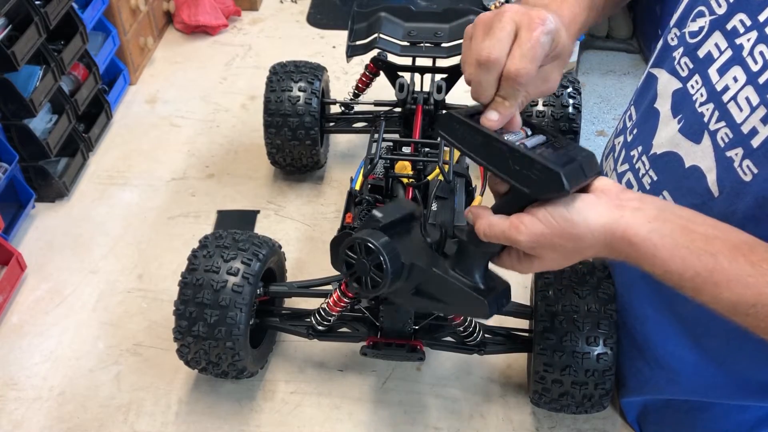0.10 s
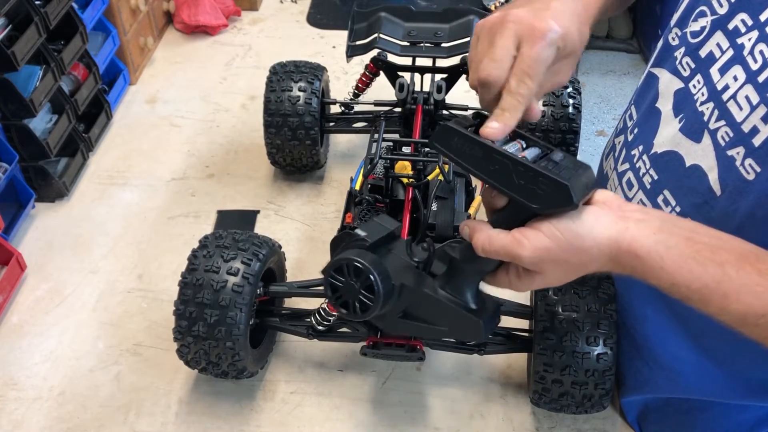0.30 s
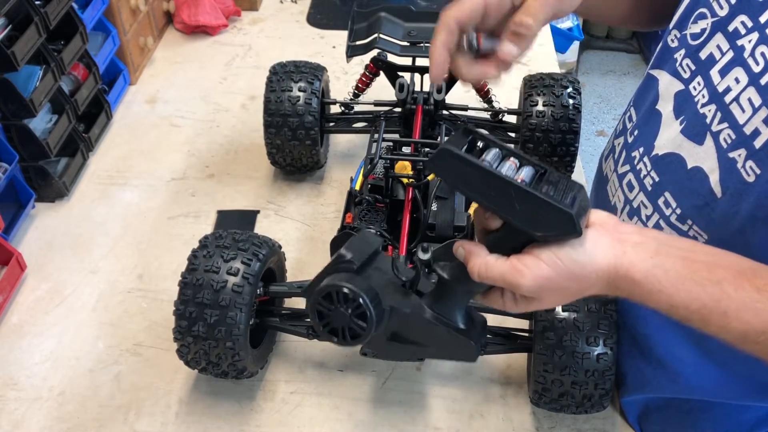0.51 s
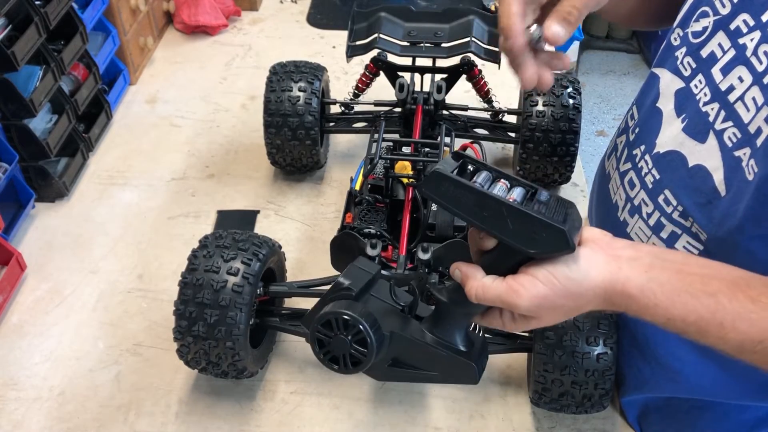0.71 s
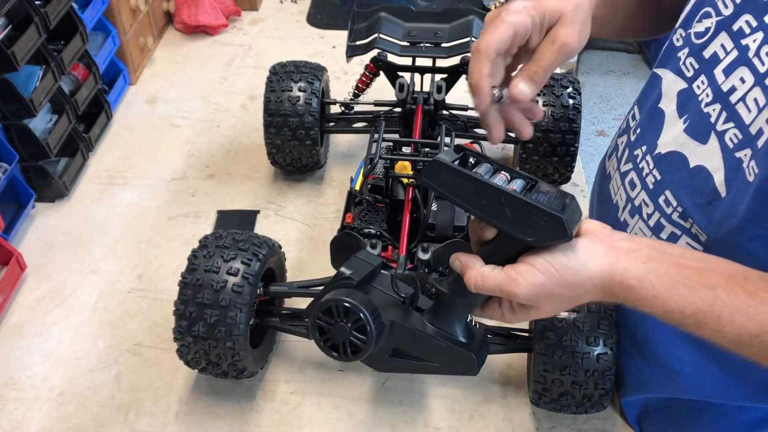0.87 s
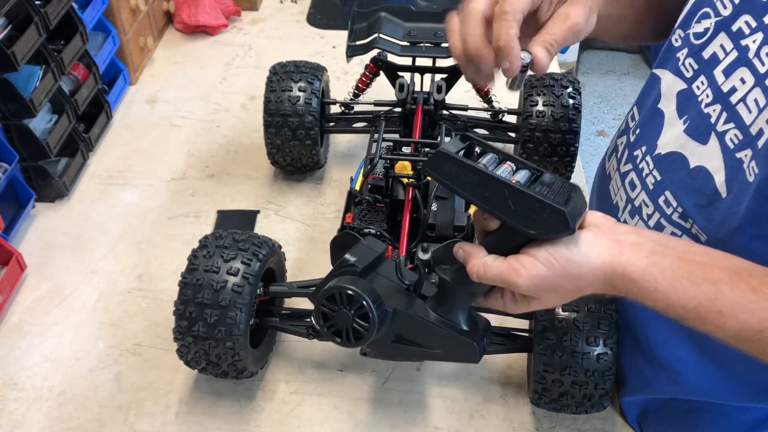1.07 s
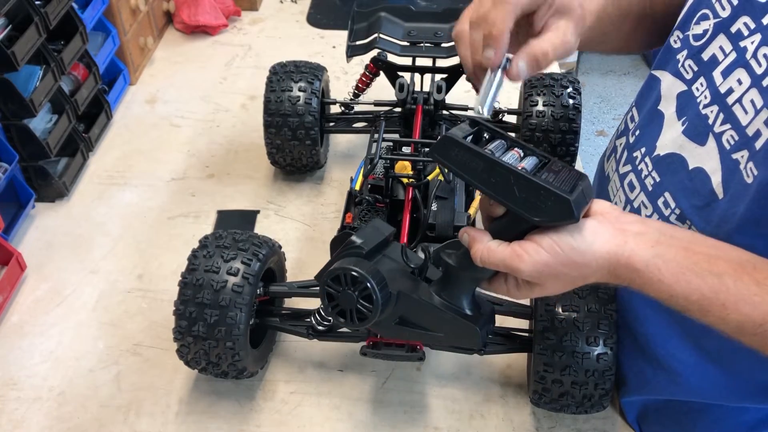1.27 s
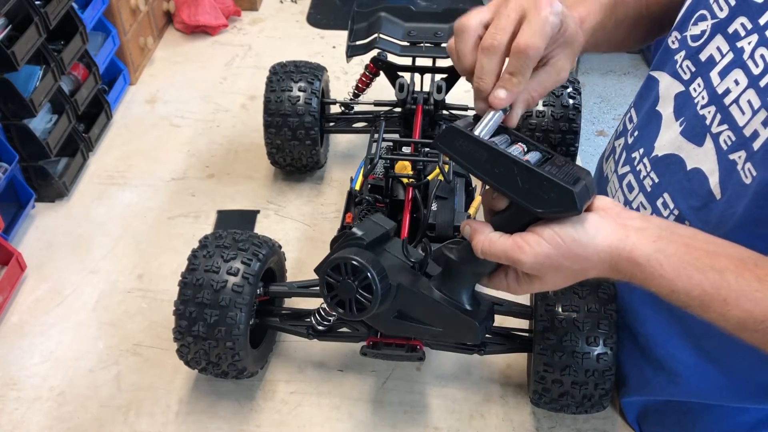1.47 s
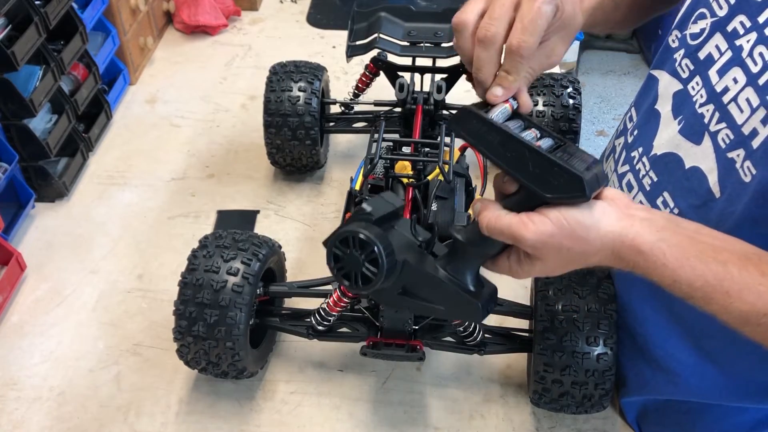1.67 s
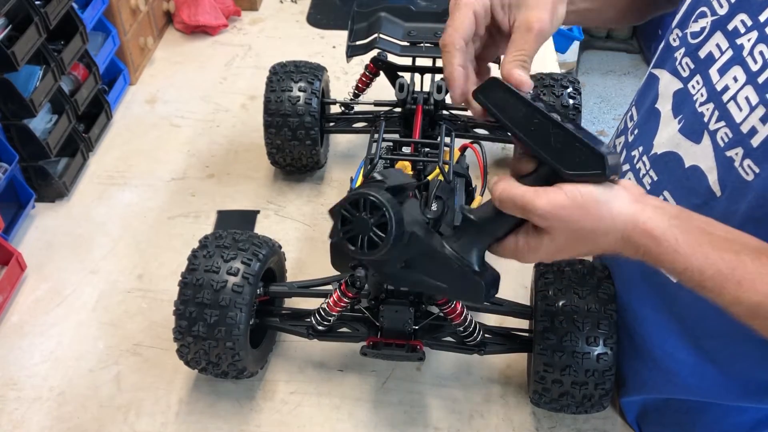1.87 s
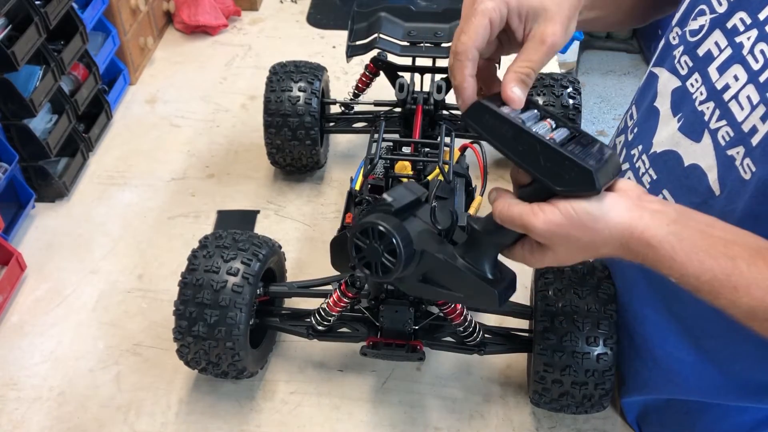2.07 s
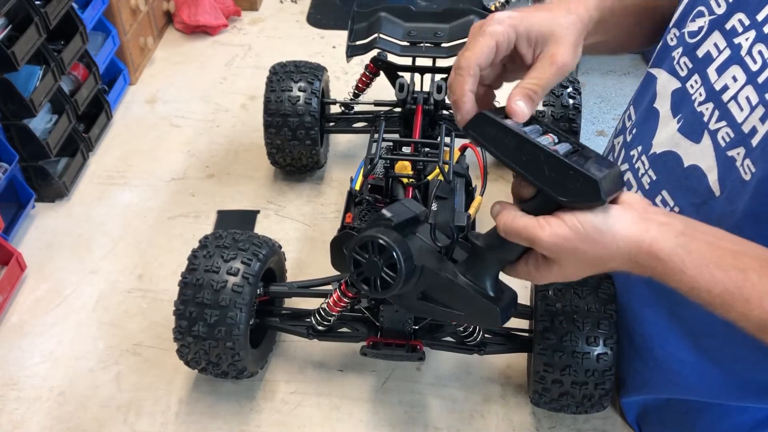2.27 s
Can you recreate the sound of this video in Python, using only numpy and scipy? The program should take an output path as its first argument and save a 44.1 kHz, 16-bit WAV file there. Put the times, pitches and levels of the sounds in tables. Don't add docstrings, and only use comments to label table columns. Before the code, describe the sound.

Batteries snap sharply into a plastic handheld controller, with small scrapes, in a quiet workshop

```python
import sys
import numpy as np
from scipy import signal
from scipy.fft import rfft, irfft, next_fast_len
from scipy.io import wavfile
from scipy.ndimage import map_coordinates

SR = 44100
rng = np.random.default_rng(int(sys.argv[2]) if len(sys.argv) > 2 else 0)


def int16_out(signal):
    q = np.round(np.clip(np.atleast_2d(signal).T, -1, 1) * 32767)
    wavfile.write(sys.argv[1], SR, q.astype(np.int16))


def boost_factor(decibels):
    exponent = np.asarray(decibels, float) / 20
    return 10 ** exponent


N = 105840


def unit(x):
    return x / np.sqrt(np.mean(x ** 2) + 1e-20)


def along(points, hz):
    point_hz, value = np.transpose(points)
    return np.interp(np.log(hz + 1), np.log(point_hz + 1), value)


def coloured(x, gain):
    size = next_fast_len(len(x) + 8192)
    spectrum = rfft(x, size) * gain(np.fft.rfftfreq(size, 1 / SR))
    return irfft(spectrum, size)[:len(x)]


def bell(hz, centre_hz, octaves):
    distance = np.log2((hz + 1) / centre_hz) / max(octaves, 0.05)
    return np.exp(-0.5 * distance ** 2)


def wobble(rate_hz):
    knots = rng.standard_normal(int(N * rate_hz / SR) + 4)
    return map_coordinates(knots, [np.arange(N) * rate_hz / SR])


def add(track, start_s, sound):
    part = track[round(start_s * SR):][:len(sound)]
    part += sound[:len(part)]


# pitch_hz, level_db (per Hz)
RUMBLE_COLOUR = [(40, -38), (52, 0), (170, -5.5), (230, 0), (390, -7.5), (1080, -7.5), (2000, -20.5),
                 (3500, -53)]
# pitch_hz, level_db (per Hz)
HISS_COLOUR = [(1500, -10), (2400, -3), (3870, 0), (6090, -2), (8000, -3), (10200, -11.5), (12500, -18),
               (15700, -17)]
# time_s, level_db
HISS_FADE = [(0, -60.5), (.5, -60.5), (.9, -60.5), (1.2, -63), (1.5, -62.5), (2.4, -63)]
# pitch_hz, width_hz, level_db
FUZZY_HUMS = [
    (55.5, 15, -66),
    (122.8, 23, -68.5),
    (237, 25, -71),
    (1001, 9.2, -78),
    (9620, 48, -79),
]


def ventilation():
    def air(colour):
        return unit(coloured(rng.standard_normal(N),
                             lambda f: boost_factor(along(colour, f)) * (f < 15800) * (f > 36)))

    rumble_db = -60 + 0.6 * wobble(7.1)
    out = boost_factor(rumble_db) * air(RUMBLE_COLOUR)
    hiss_db = np.interp(np.arange(N) / SR, *np.transpose(HISS_FADE))
    out = out + boost_factor(hiss_db + 0.13 * wobble(9.7)) * air(HISS_COLOUR)
    for pitch_hz, width_hz, level_db in FUZZY_HUMS:
        hum = coloured(rng.standard_normal(N), lambda f: 1 / (1 + (2 * (f - pitch_hz) / width_hz) ** 2))
        out = out + boost_factor(level_db) * unit(hum)
    return out


# start_s, length_s, pitch_hz, level_db
BIRD_NOTES = [
    (0.752, 0.056, 4520, -63.5),
    (0.808, .06, 3610, -65),
    (.815, 0.041, 4420, -70),
    (.875, .03, 3600, -68),
    (2.238, 0.059, 5050, -63),
    (2.25, 0.12, 3400, -67),
]


def far_bird():
    out, clock = np.zeros(N), np.arange(N) / SR
    blur_hz = 170
    for start_s, length_s, pitch_hz, level_db in BIRD_NOTES:
        progress = np.clip((clock - start_s) / length_s, 0, 1)
        swell = np.sqrt(np.abs(np.sin(np.pi * progress))) * (progress < 1)
        smear = unit(coloured(rng.standard_normal(N), lambda f: np.exp(-((f - pitch_hz) / blur_hz) ** 2)))
        out = out + boost_factor(level_db) * swell * smear
    return out


# pitch_hz, decay_s
ROOM_DECAY = [(300, 0.46), (800, 0.34), (2100, 0.39), (5500, 0.39), (14600, .22)]
# pitch_hz, level_db
ROOM_COLOUR = [(300, -2), (1500, 1.5), (5000, -1), (15000, -2.5)]


def room(x):
    tail_db, tail_delay_s = -9.5, 0.0027
    bench_db, bench_decay_s, bench_rise_s = -9, 0.022, 0.003
    hz, t, noise = signal.stft(rng.standard_normal(SR // 2), SR, nperseg=256)
    fall_db = 60 * t / along(ROOM_DECAY, hz)[:, None]
    gain = boost_factor(along(ROOM_COLOUR, hz)[:, None] - fall_db)
    tail = signal.istft(noise * gain, SR, nperseg=256)[1]
    u = np.arange(len(tail)) / SR
    tail = tail * (1 - np.exp(-(u / tail_delay_s) ** 2))
    bench = rng.standard_normal(len(u)) * boost_factor(-60 * u / bench_decay_s)
    bench = bench * np.clip(u / bench_rise_s - 0.5, 0, 1)
    answer = boost_factor(tail_db) * tail / np.linalg.norm(tail) + boost_factor(bench_db) * bench / np.linalg.norm(bench)
    answer[0] = 1
    return signal.fftconvolve(x, answer)


# start_s, peak_db, centre_hz, spread_octaves, length_s
SMALL_SCRAPES = [(0.033, -42, 4860, 1, 0.0017), (0.037, -43, 4670, .8, 0.0032),
                 (0.038, -32.5, 3340, 0.43, 0.0045), (0.05, -37, 13000, 0.43, 0.0012),
                 (0.2008, -41, 5560, 1.2, 0.004), (0.202, -46, 1580, 0.18, 0.014),
                 (0.474, -41.5, 3430, 1.3, 0.0054), (0.4783, -36.5, 3070, .5, .006),
                 (1.287, -51, 12000, .5, 0.0026), (1.471, -46, 370, 0.23, 0.023),
                 (1.599, -39.5, 503, 0.77, 0.023), (1.607, -41, 2470, 0.92, 0.012),
                 (1.674, -48, 13500, .1, .004), (1.697, -44, 358, 0.26, 0.027),
                 (1.784, -56, 13700, .3, .003), (1.8025, -39.5, 3780, 0.77, .005),
                 (1.807, -40, 2830, 0.23, 0.0079), (1.858, -36.5, 3790, 0.66, 0.0039),
                 (1.891, -42, 2370, 0.63, 0.018), (1.894, -39, 3970, 0.98, 0.01),
                 (1.918, -39, 3700, 0.64, 0.0088), (1.928, -34, 870, 0.48, 0.0014),
                 (1.935, -29, 1900, 0.85, 0.0056), (2.093, -36, 4770, 0.99, 0.0053)]


def scrapes():
    out, t = np.zeros(N), np.arange(SR // 20) / SR
    slip_scatter_db, rise_s = 3, 0.00078
    for start_s, peak_db, centre_hz, spread_octaves, length_s in SMALL_SCRAPES:
        slips = rng.standard_normal(len(t)) * boost_factor(slip_scatter_db * rng.standard_normal(len(t)))
        rub = unit(coloured(slips, lambda f: bell(f, centre_hz, spread_octaves)))
        shape = np.clip(t / rise_s, 0, 1) * np.exp(-(t / length_s) ** 2)
        add(out, start_s, boost_factor(peak_db - 8.5) * room(rub * shape))
    return out


# start_s, peak_db, panel_hz (loudest panel), spread_octaves (of rung tones), crack_db
BATTERY_SNAPS = [(0.0396, -27.5, 1350, 0.31, -10), (.0425, -34.5, 700, 0.067, -22),
                 (.2238, -13, 1780, 1.11, -2.5), (0.223, -15.5, 5500, 0.65, -8),
                 (0.231, -15, 1850, 0.52, -18), (0.2359, -14.5, 4660, 0.13, 0.5),
                 (.2358, -10.5, 1520, 0.88, -7.5), (.2375, -23.5, 672, 0.14, -20),
                 (0.2403, -13.5, 2450, .4, -14), (1.4579, -29.5, 4000, 0.35, -21),
                 (1.4594, -27, 2075, 0.2, -28), (1.461, -36, 697, 0.29, -2.5),
                 (1.5899, -31, 3300, .45, -10.5), (1.6661, -27.5, 2030, 0.88, -11),
                 (1.67, -28, 1190, 0.17, -28), (1.7113, -31.5, 1560, 0.77, -20),
                 (1.9409, -14.5, 3034, 0.25, 0.5), (1.9403, -12, 14800, 0.35, -9),
                 (1.9408, -26, 1480, 0.22, -14), (1.941, -26, 963, 0.63, -6),
                 (2.0936, -15.5, 3380, 0.29, -5), (2.0935, -17, 2510, 0.31, -6),
                 (2.096, -30, 1130, 0.31, -14), (2.0965, -28.5, 703, 0.15, -14)]
CASING_TONES = [370, 520, 688, 1200, 1400, 1570, 1750, 2050, 2460, 2770, 3300, 3700, 4350, 4900]
# pitch_hz, level_db
CRACK_COLOUR = [(1000, -8), (3000, -1.5), (6000, 12), (9000, 4.5), (12000, 6.5), (15500, 1)]


def snaps():
    out, t = np.zeros(N), np.arange(SR // 10) / SR
    hz = np.array(CASING_TONES)[:, None]
    ring_cycles, rattle_cycles = 30, 36
    panel_db, rattle_db, tone_scatter_db = 2, -6, 2
    attack_s, crack_decay_s = 0.0003, 0.006
    for start_s, peak_db, panel_hz, spread_octaves, crack_db in BATTERY_SNAPS:
        gains = boost_factor(tone_scatter_db * rng.standard_normal(hz.shape)) * bell(hz, panel_hz, spread_octaves)
        gains = gains * (hz / panel_hz) ** 0.8
        tones = np.sin(2 * np.pi * (hz * t + rng.random(hz.shape)))
        ring = (gains * boost_factor(-60 * t * hz / ring_cycles) * tones).sum(axis=0)
        panel_fade = boost_factor(panel_db - 60 * t * panel_hz / ring_cycles)
        ring = ring + panel_fade * np.sin(2 * np.pi * panel_hz * t)

        rattle = unit(coloured(rng.standard_normal(len(t)),
                               lambda f: bell(f, panel_hz, spread_octaves * 1.5)))
        rattle = rattle * boost_factor(rattle_db - 60 * t * panel_hz / rattle_cycles)
        body = (ring + rattle) * (1 - np.exp(-t / attack_s))

        crack = unit(coloured(rng.standard_normal(len(t)), lambda f: boost_factor(along(CRACK_COLOUR, f))))
        crack = crack * boost_factor(crack_db - 60 * t / crack_decay_s) * (1 - np.exp(-2 * t / attack_s))
        add(out, start_s, boost_factor(peak_db) * room(body / np.abs(body).max() + crack))
    bass_cut = signal.butter(4, 260, "high", fs=SR, output="sos")
    return signal.sosfilt(bass_cut, out)


def scene():
    return (snaps() + scrapes() + ventilation() + far_bird())[None]


def roll_off(x):
    return signal.sosfilt(signal.butter(12, 17170, fs=SR, output="sos"), x)


def record(dry):
    top_limit = signal.ellip(10, 0.5, 70, 16850, fs=SR, output="sos")
    mix = signal.sosfilt(top_limit, dry)
    return roll_off(mix)


dry = scene()
out = record(dry)
int16_out(out)
```